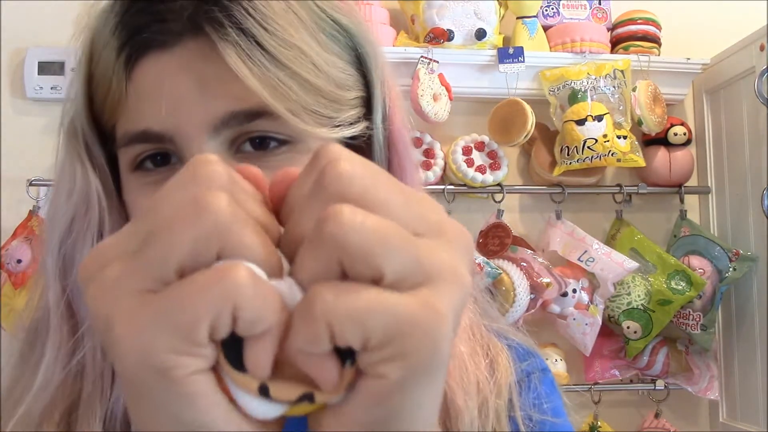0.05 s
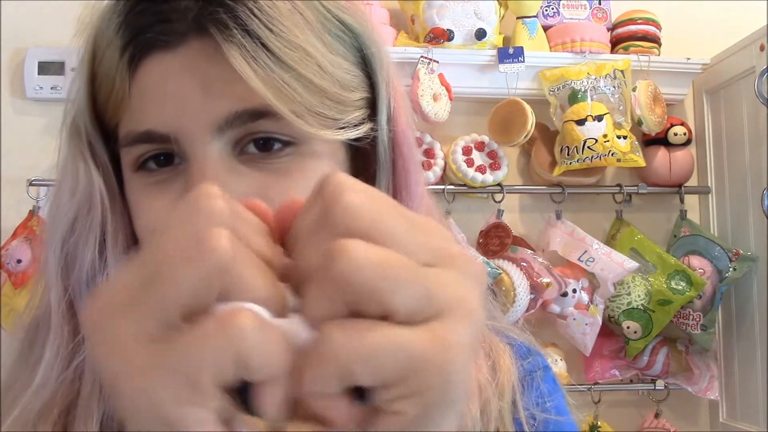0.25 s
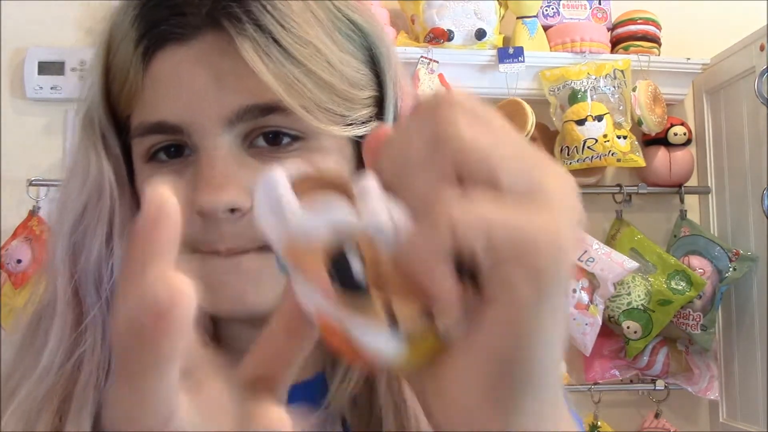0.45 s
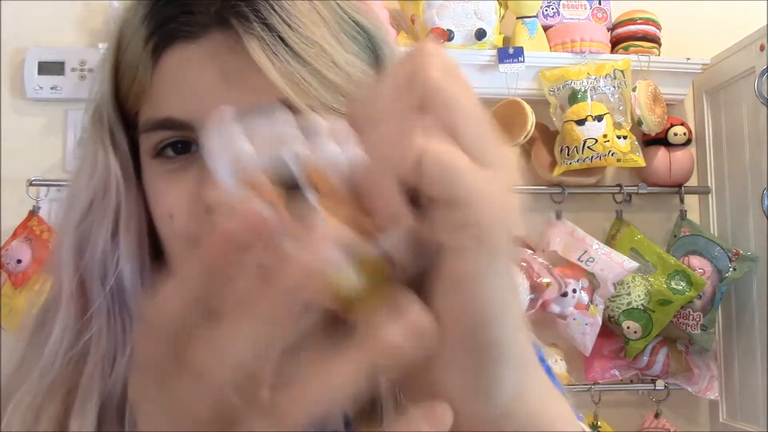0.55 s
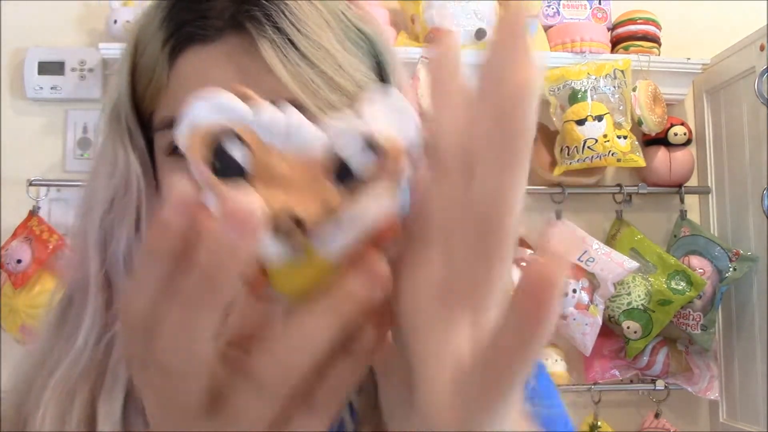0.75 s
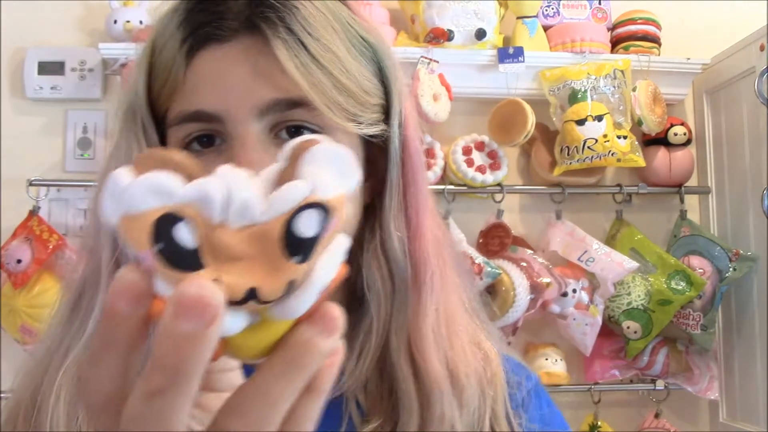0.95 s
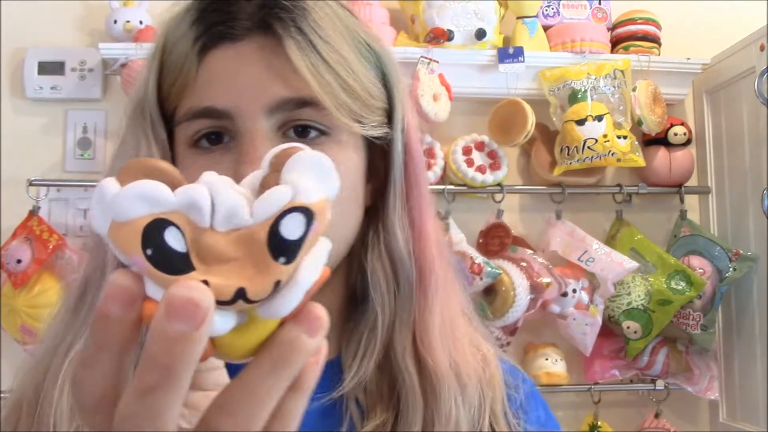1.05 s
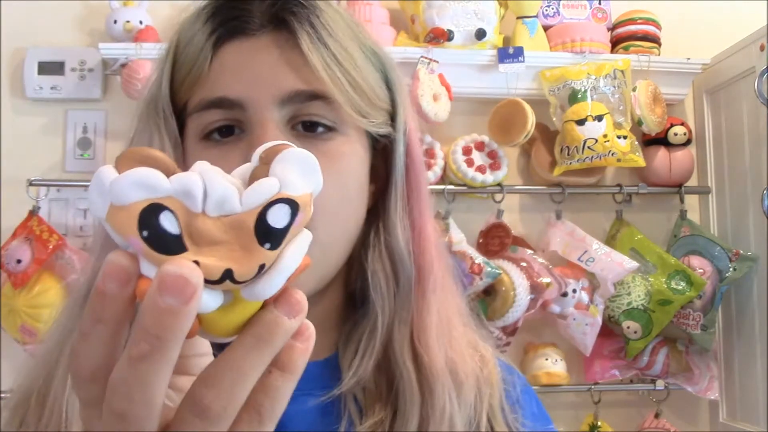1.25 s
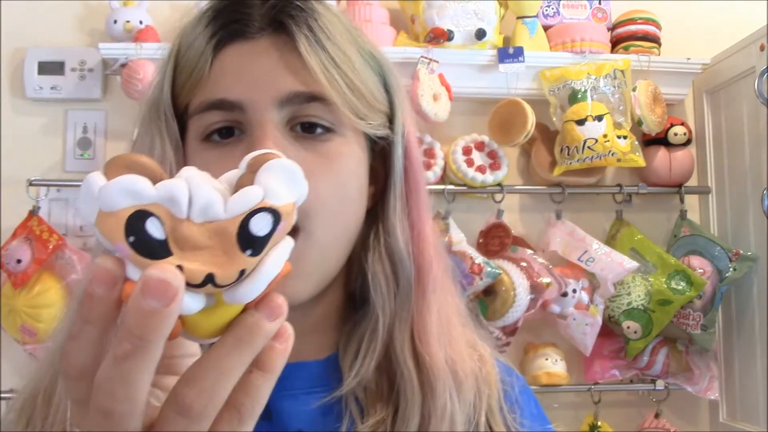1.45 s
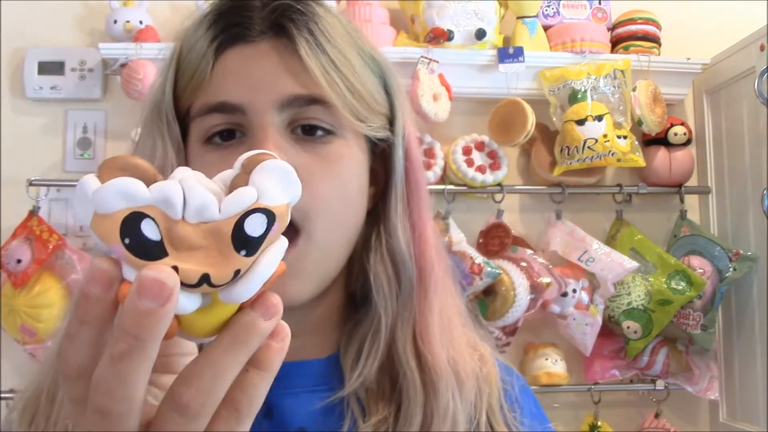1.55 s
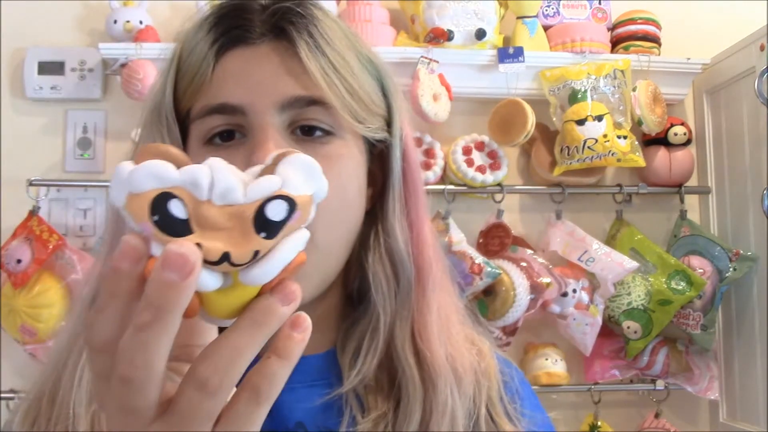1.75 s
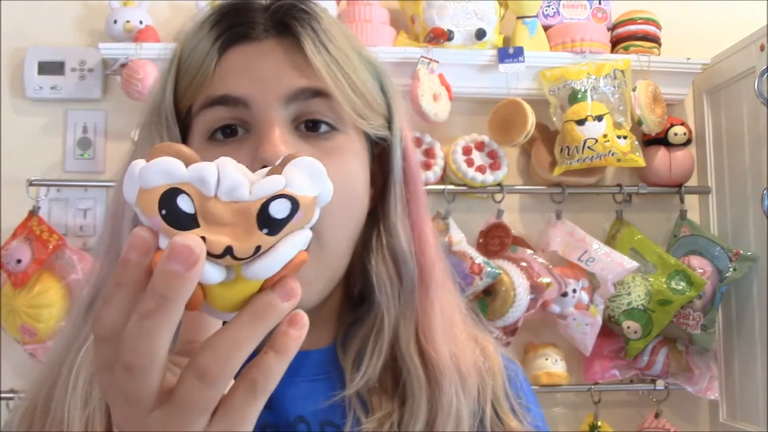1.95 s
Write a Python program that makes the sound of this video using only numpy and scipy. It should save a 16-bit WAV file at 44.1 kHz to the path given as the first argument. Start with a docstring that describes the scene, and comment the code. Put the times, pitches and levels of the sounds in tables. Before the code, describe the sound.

Close squishy foam toy in the hands, tacky skin ticking and crackling in brief bursts, a pause, one hard wet smack, another pause, then denser sticky squelching to the end; short room reflections, faint steady air noise.

```python
"""A faint steady hum of air runs throughout, while a wet foam toy is squeezed and let go close by.
Its tacky skin peels off the fingers in single snaps, each made of four short rings and a noise burst.
Runs of fine crackle over a dull rub are streams of tiny random pops, rising and falling with each stroke.
One loud wet pop, a stack of short rings and a noise burst, stands out; a small room answers the toy
with a brief noise tail."""
import sys
import numpy as np
from scipy import signal
from scipy.fft import rfft, irfft, next_fast_len
from scipy.io import wavfile

SR = 44100
rng = np.random.default_rng(int(sys.argv[2]) if len(sys.argv) > 2 else 0)


def master_out(mix):
    """Clip the mix to full scale and print it as 16-bit PCM to the path in sys.argv[1]."""
    frames = np.transpose(np.atleast_2d(mix))
    ceiling = np.clip(frames, -1, 1)
    pcm = np.round(ceiling * 32767).astype(np.int16)
    wavfile.write(sys.argv[1], SR, pcm)


N = 88508  # length in samples, about 2 s
T = np.arange(N) / SR
BRIEF = np.arange(SR // 40) / SR  # 25 ms, room for one short sound


def amp(db):
    """Turn decibels into gain."""
    return 10 ** (np.asarray(db) / 20)


def unit(x):
    """Scale to an average (rms) level of 1."""
    return x / np.sqrt(np.mean(x ** 2) + 1e-20)


def along(points, hz):
    """Read a curve of (pitch_hz, value) points, with pitch on a log scale."""
    point_hz, value = np.transpose(points)
    return np.interp(np.log(hz + 1), np.log(point_hz + 1), value)


def coloured(x, points):
    """Filter a sound to follow (pitch_hz, level_db) points without smearing it backwards in time."""
    n = x.shape[-1]
    m = 2 * next_fast_len(n)
    gain = amp(along(points, np.fft.rfftfreq(m, 1 / SR)))
    # folding the cepstrum forward gives a filter that never answers before its input
    cepstrum = irfft(np.log(gain), m)
    cepstrum[1:m // 2] *= 2
    cepstrum[m // 2 + 1:] = 0
    return irfft(rfft(x, m) * np.exp(rfft(cepstrum)), m)[..., :n]


def add(track, start_s, sound):
    """Mix a sound into a track at a given time."""
    i = round(start_s * SR)
    part = track[..., i:i + sound.shape[-1]]
    part += sound[..., :part.shape[-1]]


# How the steady air noise is spread over pitch: pitch_hz, level_db
AIR_SPECTRUM = [(15, -72.5), (25, -31), (134, -8), (166, -7), (301, -4.5), (335, -12.5), (363, -6.5),
                (575, -15), (624, -13.5), (911, -13.5), (3430, -27.5), (5730, -30.5), (16000, -42.5)]
# How much the air noise differs between left and right: pitch_hz, side_db
AIR_WIDTH = [(40, -13), (120, -9.5), (400, -8), (1500, -9.5), (8000, -11)]
AIR_DB = -56
WHINE_HZ, WHINE_DB = 5600, -76.5  # a faint electrical whine


def air():
    """The steady low noise of the room, with a thin whine."""
    noise = coloured(rng.standard_normal((2, N)), AIR_SPECTRUM)
    mid, side = amp(AIR_DB) * unit(noise)
    side = coloured(side, AIR_WIDTH)
    whine = amp(WHINE_DB) * np.sin(2 * np.pi * WHINE_HZ * T)
    return np.array([mid + side, mid - side]) + whine


# How long the room rings, as the time to fall by 60 dB: pitch_hz, fall_s
ROOM_FALL = [(200, 0.49), (600, 0.28), (1500, 0.29), (3000, 0.23), (6000, 0.23), (14000, 0.22)]
# The tone of the room's answer: pitch_hz, level_db
ROOM_TONE = [(100, -14.5), (300, -5), (650, 3.5), (1200, -1), (1900, -1), (2500, -2.5), (3600, 2),
             (6000, -4), (10000, -4.5), (16000, -4)]
ROOM_DB, ROOM_SIDE_DB, WALL_DELAY_S = -8.5, -19, 0.0073
EARLY_DB, EARLY_S = 2.5, 0.0059  # the first reflections stand above the tail
HAND_DB, HAND_S, HAND_DELAY_S = -10, 0.0019, 0.0005  # scatter off the cupped hands
HAND_SIDE_DB = -16
LOW_CUT_HZ = 265  # the bass is cut away below this pitch


def in_room(x):
    """A small source with scatter off the hands and the short, nearly mono answer of the room."""
    # noise whose every pitch band dies away at its own rate
    hz, t, bands = signal.stft(rng.standard_normal((2, SR // 3)), SR, nperseg=256)
    fading = bands * amp(-60 * t / along(ROOM_FALL, hz)[:, None])
    tail = signal.istft(fading, SR, nperseg=256)[1]
    tail_s = np.arange(tail.shape[1]) / SR
    tail = tail * amp(EARLY_DB * np.exp(-tail_s / EARLY_S))
    tail = amp(ROOM_DB) * coloured(tail / np.linalg.norm(tail[0]), ROOM_TONE)
    mid, side = np.pad(tail, ((0, 0), (round(WALL_DELAY_S * SR), 0)))
    mid[0] = 1  # the direct sound
    side = side * amp(ROOM_SIDE_DB)
    scatter = rng.standard_normal((2, len(BRIEF))) * np.exp(-BRIEF / HAND_S)
    scatter = amp(HAND_DB) * scatter / np.linalg.norm(scatter, axis=1, keepdims=True)
    add(mid, HAND_DELAY_S, scatter[0])
    add(side, HAND_DELAY_S, coloured(scatter[1], [(1000, -54), (3500, HAND_SIDE_DB)]))
    left_right = np.array([mid + side, mid - side])
    heard = signal.fftconvolve(x[None], left_right, axes=1)
    low_cut = signal.butter(2, LOW_CUT_HZ, 'high', fs=SR, output='sos')
    return signal.sosfilt(low_cut, heard)


def ring(hz, db, cycles):
    """A heavily damped resonance that swells for some cycles of its own pitch, then dies."""
    u = BRIEF * hz / cycles
    swell = u * np.exp(1 - u)  # peaks at 1 when u is 1
    return amp(db) * swell * np.sin(2 * np.pi * hz * BRIEF)


# The tone of a breaking wet film: pitch_hz, level_db
CRACK_SPECTRUM = [(200, -22.5), (1000, -7.5), (2200, -6.5), (3200, 5), (6000, -0.5), (10000, 6),
                  (16000, -13.5)]
CRACK_S = 0.00074  # fade time


def crack(db):
    """The even, broadband burst of a wet film breaking."""
    noise = rng.standard_normal(len(BRIEF)) * np.exp(-BRIEF / CRACK_S)
    z = rfft(noise, 2 * len(BRIEF))
    even = irfft(z / np.abs(z))[:len(BRIEF)]  # every pitch equally strong
    burst = coloured(even, CRACK_SPECTRUM)
    return amp(db) * burst / np.linalg.norm(burst) * np.sqrt(CRACK_S * SR / 2)


# Single snaps of the skin, levels before the change of ring length:
# start_s, thump_db, pocket_hz, pocket_db, film_hz, film_db, skin_hz, skin_db, crack_db
SKIN_SNAPS = [(0.0754, -42.5, 1600, -23.5, 3200, -36, 6370, -6, -16),
              (0.1727, -35.5, 2000, -30.5, 2580, -37, 5970, -20.5, -29),
              (0.2675, -74, 1770, -31.5, 2600, -29.5, 5750, -43, -52),
              (0.28, -56, 1700, -31.5, 2630, -35, 5000, -53, -52),
              (0.3097, -42, 1400, -30.5, 2120, -28.5, 6360, -23.5, -35),
              (0.3303, -70, 1580, -36.5, 2940, -32, 6000, -44, -44),
              (0.3450, -56, 1620, -51, 2700, -35, 6500, -41, -55),
              (0.4846, -53, 1225, -22, 2980, -22.5, 4350, -18, -28),
              (0.5094, -41, 990, -28.5, 1940, -34, 3300, -26, -49),
              (0.5376, -37.5, 1310, -31.5, 2370, -30.5, 3550, -30, -41),
              (0.5758, -47, 1820, -34, 2980, -32.5, 5100, -27.5, -37),
              (0.8017, -39.5, 1660, -33, 2700, -36, 5100, -31.5, -53),
              (1.0593, -43.5, 1380, -39.5, 2340, -60, 4000, -65, -66),
              (1.0967, -19.5, 1510, -37, 2750, -3.5, 6200, -9.5, -17),
              (1.1319, -64, 1410, -24.5, 2600, -22.5, 6560, -12.5, -23),
              (1.6560, -47.5, 1500, -38, 2480, -40.5, 5000, -34, -45),
              (1.6850, -58, 1310, -39, 2600, -35, 5000, -37, -44),
              (1.7, -39.5, 1690, -34, 2800, -40, 4300, -29, -56),
              (1.7327, -37, 1320, -41, 2450, -32, 4500, -28, -41),
              (1.7360, -37, 1090, -35, 2180, -27.5, 4540, -30, -47),
              (1.7739, -36, 1400, -26, 3230, -44, 6900, -29, -31.5),
              (1.793, -35, 1350, -22, 2900, -29, 6000, -26, -35.5),
              (1.7986, -26.5, 1170, -26, 2800, -18, 6700, -27, -41),
              (1.8561, -62, 1380, -36, 2830, -31, 4940, -42, -56),
              (1.9368, -40, 1220, -28.5, 2520, -34, 5440, -8, -21),
              (1.9520, -60, 1500, -26, 2640, -27, 5440, -19, -46),
              (1.9757, -58, 1270, -35, 2410, -22, 4870, -17, -28),
              (1.9955, -43, 1650, -23, 3160, -30, 5840, -15.5, -23.5),
              (2.0003, -39, 1480, -30, 2740, -23.5, 4960, -16.5, -27)]
THUMP_HZ = 555
# swell time of each ring in cycles, for a snap of middling strength
THUMP_CYCLES, POCKET_CYCLES, FILM_CYCLES, SKIN_CYCLES = 0.7, 0.56, 0.92, 0.72
LIFE_GROWS, MIDDLE_SNAP_DB = 0.3, -23.5  # stronger snaps swell longer (dB of length per dB of strength)


def snaps():
    """The skin lets go of a finger: a soft thump, a ringing air pocket and wet film, a bright tick and a crack."""
    out = np.zeros((2, N))
    for (start_s, thump_db, pocket_hz, pocket_db, film_hz, film_db,
         skin_hz, skin_db, crack_db) in SKIN_SNAPS:
        strength_db = max(pocket_db, film_db, skin_db) - MIDDLE_SNAP_DB
        life = amp(LIFE_GROWS * min(strength_db, 2))
        thump = ring(THUMP_HZ, thump_db, THUMP_CYCLES * life)
        pocket = ring(pocket_hz, pocket_db, POCKET_CYCLES * life)
        film = ring(film_hz, film_db, FILM_CYCLES * life)
        tick = ring(skin_hz, skin_db, SKIN_CYCLES * life)
        rings = (thump + pocket + film + tick) / life  # longer rings are made lower in level
        add(out, start_s, in_room(rings + crack(crack_db)))
    return out


def grains(rate, spread_db, hz, spectrum):
    """A steady stream of tiny random pops, rate per second, scaled to rms 1."""
    count = int(rate * N / SR)
    when, size, pitch, phase = rng.random((count, 4)).T
    t = np.arange(SR // 300) / SR
    pop_hz = hz * 2 ** (3 * (pitch - 0.5))  # up to an octave and a half either way
    cycles = pop_hz[:, None] * t
    level = amp(spread_db * np.minimum(-np.log(1 - size), 3))  # mostly small, a few large
    wave = np.exp(-cycles / 0.49) * np.sin(2 * np.pi * (cycles + phase[:, None]))
    pops = level[:, None] * wave
    at = (when * N).astype(int)[:, None] + np.arange(len(t))
    stream = np.bincount(at.ravel(), pops.ravel(), N)[:N]
    return unit(coloured(stream, spectrum))


# One list for each stroke of the fingers: time_s, rub_db, crackle_db
FINGER_STROKES = [
    [(.235, -83, -67), (.268, -48, -49), (.305, -56, -48.5), (.35, -62, -51), (.368, -84, -71)],
    [(.472, -86, -59), (.505, -42, -48), (.54, -53.5, -56.5), (.58, -47.5, -48.5), (.605, -95, -79),
     (.66, -88, -71)],
    [(1.055, -56, -76), (1.083, -58.5, -76), (1.089, -35.5, -42), (1.097, -35, -33)],
    [(1.6, -59.5, -67), (1.65, -60.5, -64), (1.68, -42, -46.5), (1.715, -44, -50.5), (1.738, -39, -45),
     (1.765, -41.5, -54.5), (1.797, -33, -34), (1.82, -38.5, -58), (1.86, -49.5, -60), (1.912, -51, -57),
     (1.935, -35.5, -53), (1.955, -36.5, -33.5), (2.005, -32.5, -47)],
]
# Top treble of the crackle, one value for each stroke: level_db
STROKE_SHINE = [0, 8, -3.5, -10]
# The tone of the dull rub: pitch_hz, level_db
RUB_SPECTRUM = [(80, 4.5), (200, -1.5), (400, -7.5), (620, -3.5), (900, -6.5), (1250, -8), (1800, -3.5),
                (2900, -6.5), (3900, -15), (7000, -25.5), (16000, -60)]
# The tone of the bright crackle: pitch_hz, level_db
CRACKLE_SPECTRUM = [(200, -28), (1000, -27), (2500, -5), (5500, -2.5), (8000, 0.5), (11000, -1.5),
                    (14000, -9), (16000, -26.5)]
RUB_PER_S, CRACKLE_PER_S = 2500, 1800
RUB_SPREAD_DB, CRACKLE_SPREAD_DB = 4, 4


def squelches():
    """Fingers drag over the foam: dull grains of rubbing and sparser bright crackle."""
    rub = grains(RUB_PER_S, RUB_SPREAD_DB, 2200, RUB_SPECTRUM)
    crackle = grains(CRACKLE_PER_S, CRACKLE_SPREAD_DB, 5500, CRACKLE_SPECTRUM)
    out = np.zeros(N)
    for stroke, shine_db in zip(FINGER_STROKES, STROKE_SHINE):
        bright = coloured(crackle, [(7000, 0), (14000, shine_db)])
        time_s, rub_db, crackle_db = np.transpose(stroke)
        for layer, db in ((rub, rub_db), (bright, crackle_db)):
            level_db = np.interp(T, time_s, db, left=-120, right=-120)  # inaudible outside the stroke
            out += layer * amp(level_db)
    return in_room(out)[:, :N]


# The resonances of the loud pop: pitch_hz, level_db, swell_cycles
POP_RINGS = [(464, -18.5, 0.44), (760, -16, 0.72), (1620, -16, 0.52), (2415, 0, 0.69), (3350, -7, 1.53),
             (4915, -6, 0.98), (6560, -11.5, 2.1)]
POP_S, POP_CRACK_DB = 1.0987, -13


def pop():
    """A larger wet seal breaks open with a smack."""
    out = np.zeros((2, N))
    rings = sum(ring(hz, db, cycles) for hz, db, cycles in POP_RINGS)
    add(out, POP_S, in_room(rings + crack(POP_CRACK_DB)))
    return out


def scene():
    """The toy in front of the microphone, in its room."""
    return air() + snaps() + squelches() + pop()


TOP_HZ = 16300


def record(dry):
    """The recorder cuts very steeply above its band limit."""
    m = next_fast_len(N + SR // 4)
    hz = np.fft.rfftfreq(m, 1 / SR)
    gain = 1 / np.sqrt(1 + (hz / TOP_HZ) ** 120)
    return irfft(rfft(dry, m) * gain, m)[:, :N]


dry = scene()
out = record(dry)
master_out(out)
```